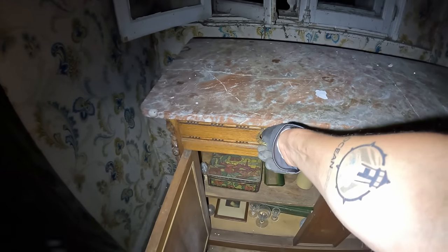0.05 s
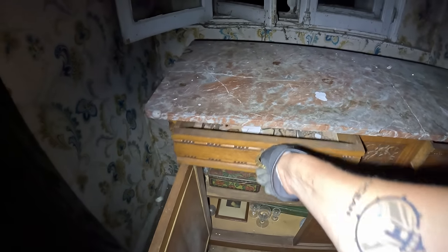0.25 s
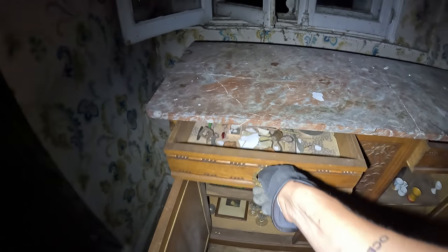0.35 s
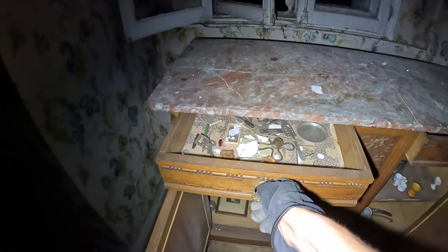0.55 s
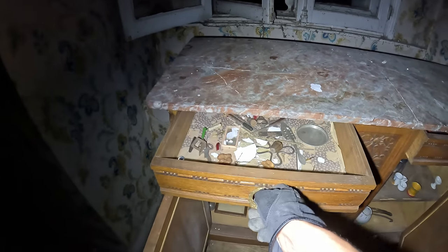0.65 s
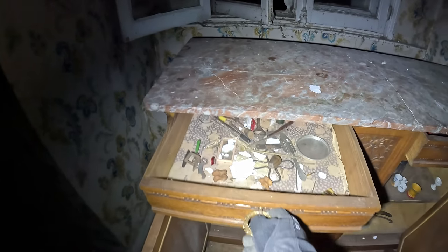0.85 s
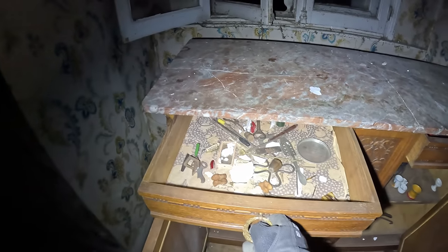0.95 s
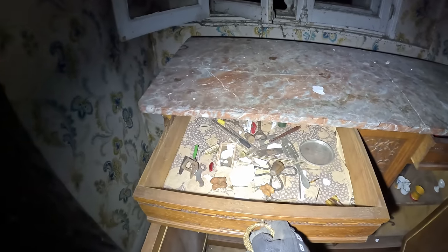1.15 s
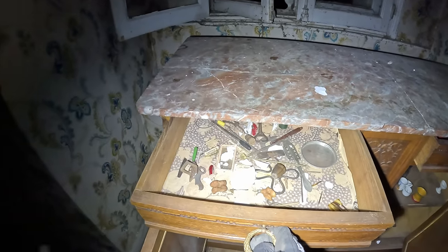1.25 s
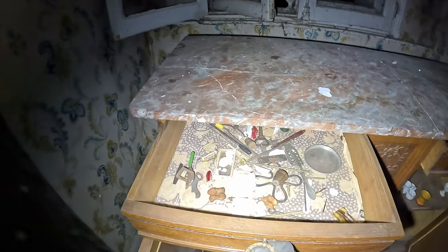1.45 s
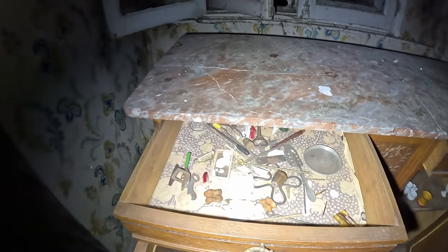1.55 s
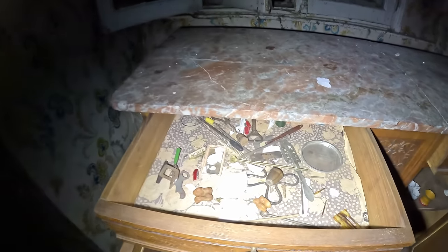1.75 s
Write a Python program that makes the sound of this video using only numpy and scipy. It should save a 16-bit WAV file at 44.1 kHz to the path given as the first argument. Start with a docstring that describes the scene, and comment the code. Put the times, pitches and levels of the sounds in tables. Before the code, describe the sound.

An old wooden drawer cracks loose and is pulled open with a burst of hollow knocks, juddering scrape and low groan; small utensils clink, the handle clacks, and soft bumps follow. Close microphone, quiet bare room.

```python
"""A wooden drawer is pulled open in a bare, quiet room: struck wood modes, knocks and stick-slip judder.
Noise-burst cracks free it; a resonant groan and grainy rubbing follow its slide over the runners.
Cutlery clinks as high damped modes; the pull clacks as the gloved hand lets go with a swish of noise.
Soft hollow bumps settle the drawer, over a low cabinet shudder and faint room tone."""
import sys
import numpy as np
from scipy import signal
from scipy.io import wavfile

SR = 44100
rng = np.random.default_rng(int(sys.argv[2]) if len(sys.argv) > 2 else 0)


def bounce(signal):
    """Save signal as a 16-bit WAV file at the path given by the first command-line argument."""
    frames = np.transpose(np.atleast_2d(signal))
    limited = np.clip(frames, -1, 1)
    pcm = np.round(limited * 32767).astype(np.int16)
    wavfile.write(sys.argv[1], SR, pcm)


N = 79380
TIME, RING = np.arange(N) / SR, np.arange(SR // 3) / SR  # s: whole scene, one blow


def amp(db):
    """Decibels to gain."""
    return 10 ** (np.asarray(db) / 20)


def evened(x):
    """Scales a steady sound to rms 1."""
    return x / np.sqrt(np.mean(x ** 2) + 1e-20)


def unit(x):
    """Scales a blow to the energy of 10 ms at rms 1."""
    return x / np.sqrt(np.sum(x ** 2) / (SR / 100) + 1e-20)


def read(points, hz):
    """Reads a table on a log-frequency axis."""
    point_hz, value = np.transpose(points)
    return np.interp(np.log(hz + 1), np.log(point_hz + 1), value)


def level(points):
    """Gain over time from a dB curve."""
    return amp(np.interp(TIME, *np.transpose(points)))


def add(mix, start_s, sound):
    """Mixes a sound in at a time."""
    part = mix[max(round(start_s * SR), 0):][:len(sound)]
    part += sound[:len(part)]


def colour(x, points):
    """Causal minimum-phase filter with a given spectrum."""
    log_gain = np.log(amp(read(points, abs(np.fft.fftfreq(8192, 1 / SR)))))
    spectrum = np.exp(np.conj(signal.hilbert(log_gain)))
    taps = np.fft.ifft(spectrum).real[:4096]
    return signal.fftconvolve(x, taps)[:len(x)]


def soften(x, cutoff_hz):
    """A softer contact loses its treble: second-order low-pass."""
    b, a = signal.butter(2, cutoff_hz, fs=SR)
    return signal.lfilter(b, a, x)


def ring(modes, rise_s=0):
    """Decaying modes of a struck object; a slow contact swells them in."""
    swell = 1 - np.exp(-(RING / (rise_s + 1e-9)) ** 2)
    total = np.zeros(len(RING))
    for k, (hz, db, t60_s) in enumerate(modes):
        decay = amp(db - 60 * RING / t60_s)
        total += (-1) ** k * decay * np.sin(2 * np.pi * hz * RING)  # alternate polarity
    return unit(swell * total)


def burst(points, t60_s):
    """Many close modes that die at once: coloured, decaying noise."""
    noise = rng.standard_normal(len(RING)) * amp(-60 * RING / t60_s)
    return unit(colour(noise, points))


# room decay: freq_hz, t60_s
ROOM_DECAY = [(60, .5), (200, 0.6), (600, 0.7247), (1500, 0.73), (3500, 0.61), (7000, .5), (15000, 0.39)]
# left-right likeness of the room tail: freq_hz, likeness_0_to_1
TAIL_LIKENESS = [(60, 1), (150, 1), (280, 1), (600, 0.44), (1200, 0.42), (5000, 0.4), (15000, .05)]


def in_room(x, room_db, pan_db):
    """Direct sound plus the diffuse tail of a bare room; pan_db is left minus right."""
    hz, t, z = signal.stft(rng.standard_normal((2, SR)), SR, nperseg=256)
    same = read(TAIL_LIKENESS, hz)[:, None]
    mid, side = z[0] * np.sqrt(1 + same), z[1] * np.sqrt(1 - same)
    decay = amp(-60 * t / read(ROOM_DECAY, hz)[:, None])
    tail = signal.istft(np.array([mid + side, mid - side]) * decay, SR, nperseg=256)[1]
    tail *= np.clip(np.arange(tail.shape[1]) / SR / 0.0045, 0, 1) ** 2  # 4.5 ms build-up
    wet = signal.fftconvolve(x[None], tail / np.linalg.norm(tail[0]), axes=1)[:, :N]
    return (x + amp(room_db) * wet) * amp([[pan_db / 2], [-pan_db / 2]])


# modes of the drawer: freq_hz, level_db, t60_s
WOOD_MODES = [(103, -9, 0.1), (147.4, -8.5, 0.082), (203.8, -0.5, 0.11), (244, -5, 0.09), (287.9, -2, 0.11),
              (499, -6.5, 0.061), (542, -6, 0.06), (659, -7, 0.043), (781, -5, 0.055), (927, -1.5, 0.037),
              (1128, -2, 0.031), (1240, -2.5, .03), (1610, -5, .03), (2190, -3.5, 0.038)]
# dense short ring of the boards: freq_hz, level_db
BOARD_COLOUR = [(30, -22), (90, -20), (200, 2.5), (330, 2), (500, -3.5), (700, 0.5), (1000, -2.5),
                (2000, -9), (5000, -13), (15000, -39)]
BOARDS_T60_S, BOARDS_DB = 0.027, 2


def box_blow(cutoff_hz):
    """One contact excites the box modes and the dense ring of its boards."""
    boards = burst(BOARD_COLOUR, BOARDS_T60_S)
    return soften(ring(WOOD_MODES) + amp(BOARDS_DB) * boards, cutoff_hz)


# knocks of the drawer against its frame: start_s, level_db, cutoff_hz
FRAME_KNOCKS = [(.002, -45, 248), (.227, -24.5, 500), (.247, -26.5, 110), (0.261, -23, 920),
                (0.29, -22.5, 507), (.3075, -17.5, 1080), (.314, -18.5, 1310), (0.3196, -20, 690),
                (0.3254, -12.5, 1890), (.332, -12, 1230), (.3445, -12, 288), (.353, -17.5, 600),
                (.381, -19, 900), (.394, -18, 460), (.426, -23.5, 408), (.549, -28, 122), (0.593, -42, 200)]


def knocks():
    """Hard knocks ring the wooden box, each with its own brightness."""
    out = np.zeros(N)
    for start_s, level_db, cutoff_hz in FRAME_KNOCKS:
        add(out, start_s, amp(level_db) * unit(box_blow(cutoff_hz)))
    return out


# stick-slip on the runners: time_s, level_db
JUDDER_LEVEL = [(.2, -53), (.22, -27), (.3, -30), (.34, -20.5), (.41, -24.5), (.47, -32), (.59, -40),
                (.68, -48), (.8, -45.5), (.92, -39.5), (1.02, -36.5), (1.1, -44), (1.2, -47.5), (1.35, -74),
                (1.55, -85)]
SLIPS_PER_S, SLIP_JITTER, SLIP_SPREAD_DB, SLIP_CUTOFF_HZ = 140, .4, 5.5, 556


def judder():
    """Stick-slip: a stream of uneven slips rings the same wooden box."""
    gaps, sizes = rng.standard_normal((600, 2)).T
    starts_s = np.cumsum(np.exp(SLIP_JITTER * gaps)) / SLIPS_PER_S  # log-normal gaps
    slips = np.zeros(N)
    for start_s, size_db in zip(starts_s, SLIP_SPREAD_DB * sizes):
        add(slips, start_s, amp([size_db]))
    slip = box_blow(SLIP_CUTOFF_HZ)
    driven = evened(slips) * level(JUDDER_LEVEL)
    return signal.fftconvolve(driven, slip / np.linalg.norm(slip))[:N]


WOOD_PAN_DB = -0.94


def drawer():
    """Knocks and judder sound from the same wooden box in the room."""
    return in_room(knocks() + judder(), room_db=-7, pan_db=WOOD_PAN_DB)


# sharp cracks of the sticking drawer: start_s, level_db
CRACK_EVENTS = [(.133, -47.5), (.139, -53), (.197, -40), (0.2085, -22.5), (.2118, -17), (.2155, -28),
                (.218, -25), (.227, -28.5)]
# spectrum of a crack: freq_hz, level_db
CRACK_SPECTRUM = [(60, -28), (200, 3.5), (600, -9.5), (1200, 9), (2300, 2.5), (3000, -1.5), (4000, -5),
                  (6200, -9), (8000, -16.5), (11000, -30.5), (15500, -49)]
CRACK_T60_S = 0.023


def cracks():
    """The swollen wood breaks loose in a quick cluster of snaps."""
    out = np.zeros(N)
    for start_s, level_db in CRACK_EVENTS:
        add(out, start_s, amp(level_db) * burst(CRACK_SPECTRUM, CRACK_T60_S))
    return in_room(out, room_db=-2.5, pan_db=-2.8)


# groan of the runners under the slips: time_s, pitch_hz, level_db
GROAN_CURVE = [(.2, 200, -59), (.23, 198, -31), (.42, 208, -29), (.5, 159, -36.5), (.6, 151, -29),
               (.69, 155.5, -45.5), (.76, 198, -43.5), (.85, 199, -47.5), (.93, 205, -39.5),
               (1.02, 196, -36), (1.09, 182, -46.5), (1.25, 156.6, -53.5)]
GROAN_WIDTH_HZ = 46


def groan():
    """Slips excite one resonance of the drawer, which shifts as its bearing on the runners changes."""
    time_s, pitch_hz, level_db = np.transpose(GROAN_CURVE)
    hz = np.interp(TIME, time_s, pitch_hz)
    turn = np.exp(2j * np.pi * np.cumsum(hz) / SR)
    r = np.exp(-np.pi * GROAN_WIDTH_HZ / SR)
    slips = (rng.random(N) < SLIPS_PER_S / SR) * rng.choice([-1, 1], N)
    # resonator runs at 0 Hz, then is turned up to pitch
    swing = signal.lfilter([(1 - r) ** 2], [1, -2 * r, r * r], slips / turn)
    swing = swing / np.sqrt(abs(swing) + 1e-12)  # friction limits the swing
    gain = level(list(zip(time_s, level_db)))
    return in_room(evened((swing * turn).real) * gain, room_db=-12, pan_db=-0.9)


# dry rubbing of wood on wood: time_s, level_db
RUB_LEVEL = [(.115, -90), (.135, -54.5), (.2, -56.5), (.22, -26), (.32, -33.5), (.42, -32.5), (.53, -37),
             (.62, -41), (.78, -47.5), (.88, -45), (.99, -41), (1.07, -47.5), (1.13, -71), (1.2, -60),
             (1.5, -77)]
# spectrum of the rubbing: freq_hz, level_db
RUB_SPECTRUM = [(100, -13), (350, 10.5), (700, 1.5), (1050, 5), (1500, -3), (2200, -7), (3200, -7.5),
                (5500, -9.5), (7500, -17.5), (10000, -23), (12000, -38.5), (15500, -40)]
GRAINS_PER_S, GRAIN_SPREAD_DB = 3500, 1.5


def rubbing():
    """Dust and wood grain catch in countless tiny clicks."""
    hits = (rng.random(N) < GRAINS_PER_S / SR) * rng.choice([-1, 1], N)
    sizes_db = GRAIN_SPREAD_DB * np.minimum(rng.exponential(1, N), 4)
    rub = evened(colour(hits * amp(sizes_db), RUB_SPECTRUM))
    return in_room(rub * level(RUB_LEVEL), room_db=-3.5, pan_db=0.2)


# clacks of the drawer pull: start_s, level_db, cutoff_hz
PULL_CLACKS = [(.691, -38, 840), (1.12, -37, 920), (1.1981, -34.5, 6000), (1.2038, -25.5, 3280),
               (1.208, -29.5, 2800), (1.545, -33.5, 3240), (1.549, -33, 2430), (1.608, -43, 2200),
               (1.611, -36.5, 2260)]
# modes of the pull on the drawer front: freq_hz, level_db, t60_s
PULL_MODES = [(893, -8.5, 0.036), (1120.5, -1, 0.081), (1220, -7, 0.0087), (1577, -4.5, 0.041),
              (1755, 1, 0.019), (2234, 1.5, 0.033), (2386, 0, 0.015), (2810, -1.5, 0.012),
              (3610, -6.5, 0.019), (4920, -24, .02), (5650, -10, 0.017)]
# spectrum of the contact tick: freq_hz, level_db
PULL_TICK_COLOUR = [(200, -11), (650, -16), (1000, -2), (2800, -4.5), (4200, -11), (7000, -13),
                    (10000, -18), (15000, -64)]
PULL_TICK_DB, PULL_TICK_T60_S = -1, 0.018


def pull():
    """The pull drops and bounces against the drawer front: modes plus a tick per contact."""
    out, body = np.zeros(N), ring(PULL_MODES)
    for start_s, level_db, cutoff_hz in PULL_CLACKS:
        tick = amp(PULL_TICK_DB) * burst(PULL_TICK_COLOUR, PULL_TICK_T60_S)
        add(out, start_s, amp(level_db) * unit(soften(body + tick, cutoff_hz)))
    return in_room(out, room_db=-5.5, pan_db=-2)


# clinks of cutlery: start_s, level_db, pitch_ratio
CUTLERY_CLINKS = [(.389, -42.5, 0.61), (.408, -42, 0.72), (.54, -47.5, 0.84), (0.633, -48, 0.55),
                  (1.009, -49.5, 1), (1.0434, -36, 0.99), (1.052, -35.5, 1), (1.108, -48, 0.75),
                  (1.12, -41.5, 0.58), (1.123, -47, 0.8)]
# modes of the cutlery: freq_hz (at pitch_ratio 1), level_db, t60_s
METAL_MODES = [(3250, 7, 0.036), (4115, 3.5, .06), (5120, -3, 0.071), (6600, -7, .03), (8100, 3.5, 0.063),
               (8380, 0.5, .13), (8823, 4.5, 0.052), (11700, -10, .04), (13200, -18, .03)]
# spectrum of the contact tick: freq_hz, level_db
METAL_TICK_COLOUR = [(500, -5), (2000, -1), (4000, 1.5), (8500, 0), (11000, -9.5), (14000, -20),
                     (16000, -35)]
METAL_TICK_DB, METAL_TICK_T60_S = 0.5, .02


def clinks():
    """Loose utensils touch with short, damped clinks; the ratio shifts all modes of a utensil."""
    out = np.zeros(N)
    for start_s, level_db, ratio in CUTLERY_CLINKS:
        utensil = ring([(hz * ratio, db, t60_s) for hz, db, t60_s in METAL_MODES])
        tick = amp(METAL_TICK_DB) * burst(METAL_TICK_COLOUR, METAL_TICK_T60_S)
        add(out, start_s, amp(level_db) * unit(utensil + tick))
    return out


# faint after-rattle of a loose utensil: start_s, level_db
RATTLE_EVENTS = [(1.222, -50), (1.279, -66), (1.309, -56.5), (1.386, -65), (1.43, -68)]
# its modes: freq_hz, level_db, t60_s
RATTLE_UTENSIL = [(5000, 5, 0.022), (5230, -13, 0.017), (6800, -8, 0.011), (8060, -18, 0.013)]


def rattle():
    """A loose utensil rings briefly at each faint contact."""
    out = np.zeros(N)
    for start_s, level_db in RATTLE_EVENTS:
        add(out, start_s, amp(level_db) * ring(RATTLE_UTENSIL))
    return out


# one small utensil rings: start_s, level_db
PING_EVENT = (1.72, -50.5)
# its modes: freq_hz, level_db, t60_s
PING_UTENSIL = [(3700, 5, .06), (3560, -11, 0.044), (4120, -17, .06)]
PING_RISE_S = 0.0043


def ping():
    """A slow contact swells in the modes of one small utensil."""
    out = np.zeros(N)
    start_s, level_db = PING_EVENT
    add(out, start_s, amp(level_db) * ring(PING_UTENSIL, PING_RISE_S))
    return out


def cutlery():
    """All utensils sound from one place in the drawer."""
    return in_room(clinks() + rattle() + ping(), room_db=-12, pan_db=1.5)


# soft bumps as the drawer tips and settles: start_s, level_db
BUMP_EVENTS = [(1.047, -27), (1.692, -33), (1.754, -41)]
# hollow modes of the drawer: freq_hz, level_db, t60_s
HOLLOW_MODES = [(153, -11.5, 0.052), (210.5, -14.5, 0.13), (335, 3, 0.061), (388, 0.5, 0.064)]
BUMP_RISE_S = 0.0085


def bumps():
    """The open drawer rocks gently on its runners; slow contacts swell in hollow modes."""
    out = np.zeros(N)
    for start_s, level_db in BUMP_EVENTS:
        add(out, start_s, amp(level_db) * ring(HOLLOW_MODES, BUMP_RISE_S))
    return in_room(out, room_db=-4.5, pan_db=WOOD_PAN_DB)


# spectrum of the glove brushing off the pull: freq_hz, level_db
GLOVE_COLOUR = [(300, -26), (1100, -2.5), (3300, -5.5), (4000, -9.5), (5300, -7.5), (9900, -13),
                (15000, -30)]
BRUSH_S, BRUSH_RISE_S, BRUSH_HOLD_S, BRUSH_FALL_S, BRUSH_DB = 1.615, 0.011, 0.024, 0.03, -46.5


def glove():
    """A short swish of cloth: coloured noise that rises, holds and falls."""
    corners_s = BRUSH_S + np.cumsum([0, BRUSH_RISE_S, BRUSH_HOLD_S, BRUSH_FALL_S])
    shape = np.interp(TIME, corners_s, [0, 1, 1, 0])
    cloth = evened(colour(rng.standard_normal(N), GLOVE_COLOUR))
    return in_room(amp(BRUSH_DB) * shape * cloth, room_db=-9, pan_db=3)


# low shudder of the cabinet: time_s, level_db
SHUDDER_LEVEL = [(0, -60), (.19, -51), (.22, -44.5), (.35, -43), (.5, -49), (.55, -32.5), (.63, -45),
                 (.97, -57), (1.03, -36.5), (1.15, -55), (1.8, -53.5)]
# its spectrum: freq_hz, level_db
SHUDDER_SPECTRUM = [(8, -11), (22, -7.5), (45, -5.5), (70, -13.5), (120, -19), (300, -51), (1000, -97)]


def shudder():
    """The cabinet shakes at low frequency, equal in both channels."""
    return level(SHUDDER_LEVEL) * evened(colour(rng.standard_normal(N), SHUDDER_SPECTRUM))


# spectrum of the room tone: freq_hz, level_db
FLOOR_COLOUR = [(20, 2), (100, -18.5), (155, -0.5), (210, -8.5), (330, -6.5), (480, -15), (700, -34),
                (1200, -16.5), (2500, -29.5), (5000, -34), (7500, -37.5), (11000, -36), (12500, -51),
                (15500, -54)]
FLOOR_DB, FLOOR_LIKENESS = -55.5, 0.66


def background():
    """Faint room tone: coloured noise, partly shared between left and right."""
    left, other = rng.standard_normal((2, N))
    right = FLOOR_LIKENESS * left + np.sqrt(1 - FLOOR_LIKENESS ** 2) * other
    return amp(FLOOR_DB) * np.array([evened(colour(v, FLOOR_COLOUR)) for v in (left, right)])


def scene():
    """All sources together."""
    wood = drawer() + cracks() + groan() + rubbing()
    fittings = pull() + cutlery() + bumps() + glove()
    return wood + fittings + shudder() + background()


EDGE_HZ = 15800


def record(dry):
    """The recorder's band limit: a linear-phase low-pass."""
    taps = signal.firwin(511, EDGE_HZ, window=("kaiser", 9), fs=SR)
    return signal.oaconvolve(dry, taps[None], "same")


dry = scene()
out = record(dry)
bounce(out)
```